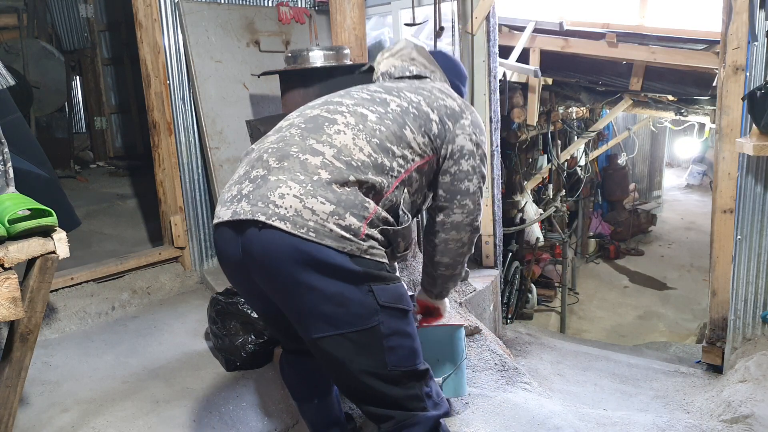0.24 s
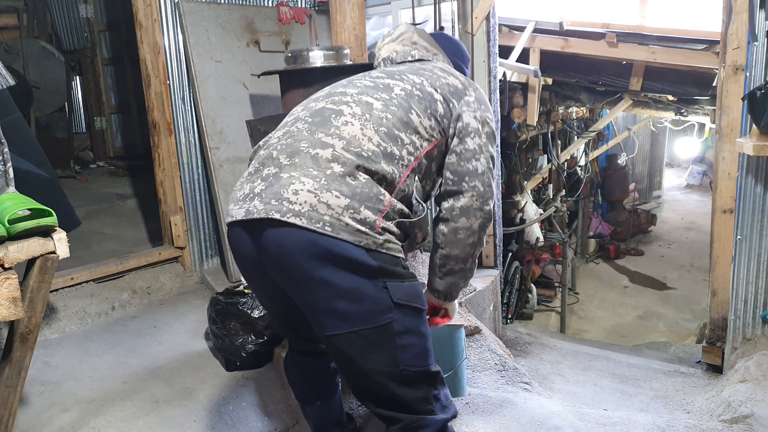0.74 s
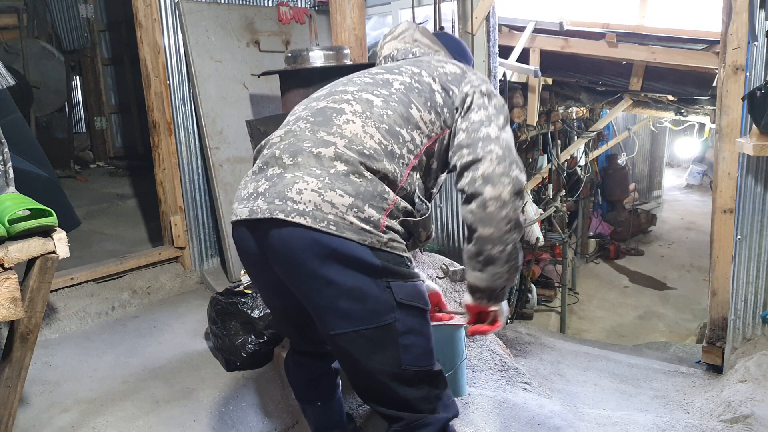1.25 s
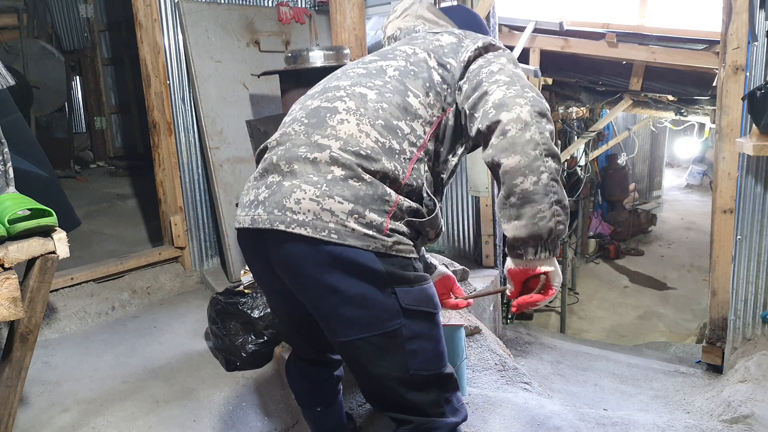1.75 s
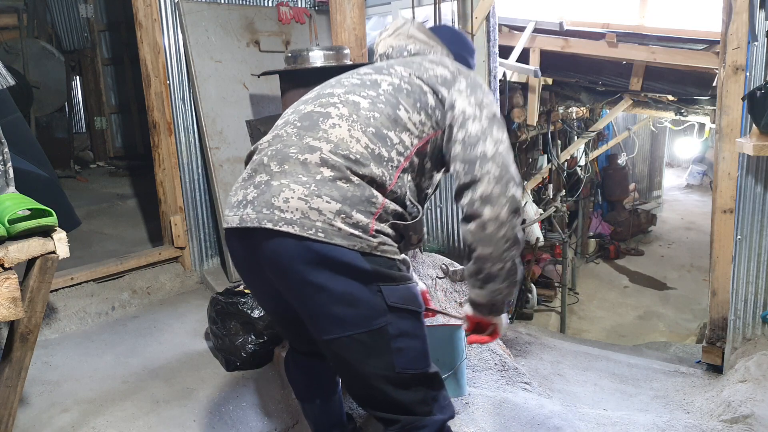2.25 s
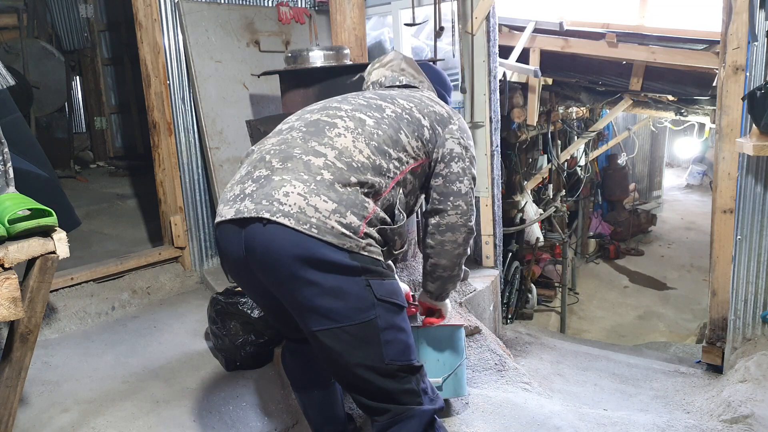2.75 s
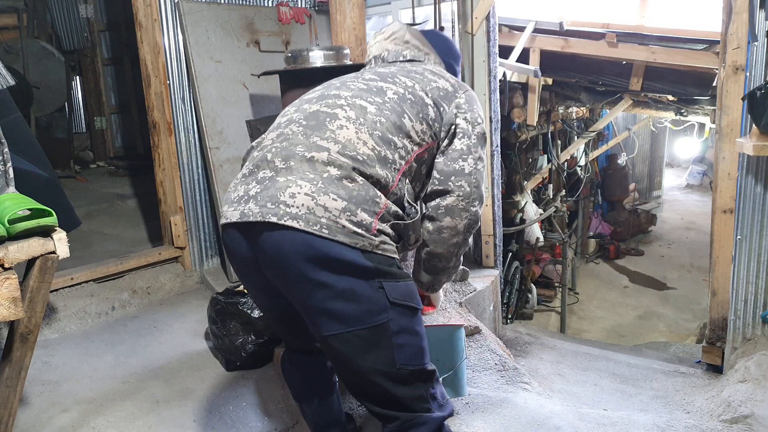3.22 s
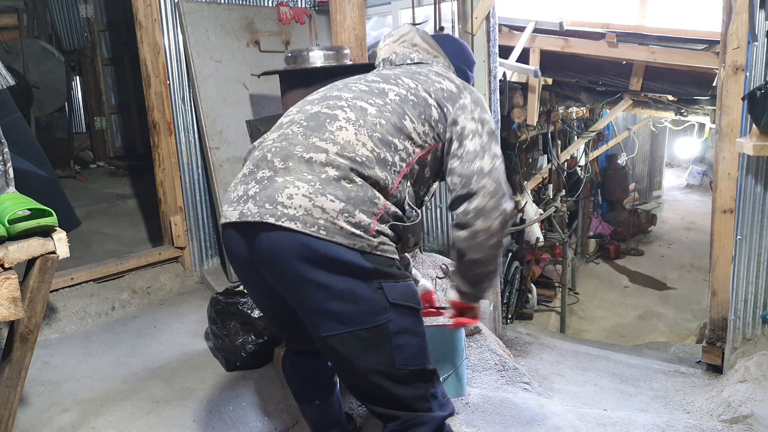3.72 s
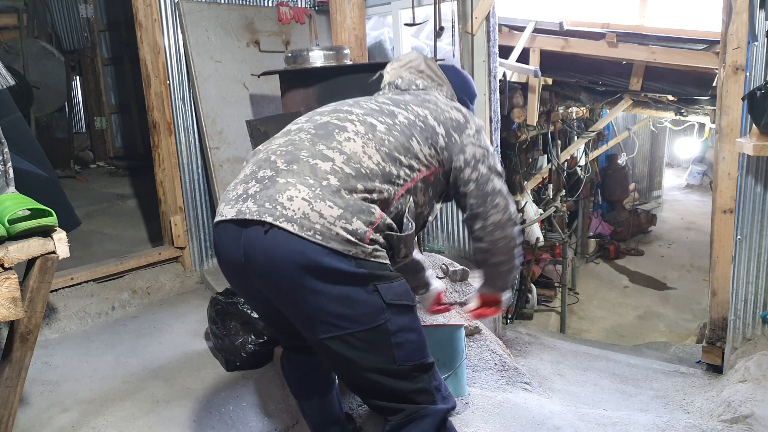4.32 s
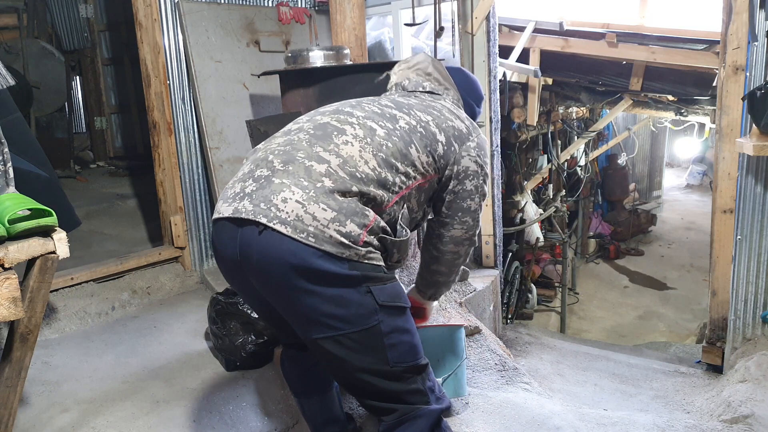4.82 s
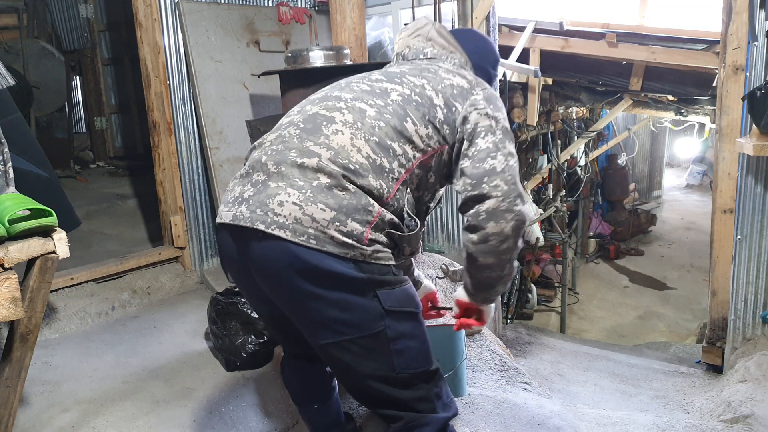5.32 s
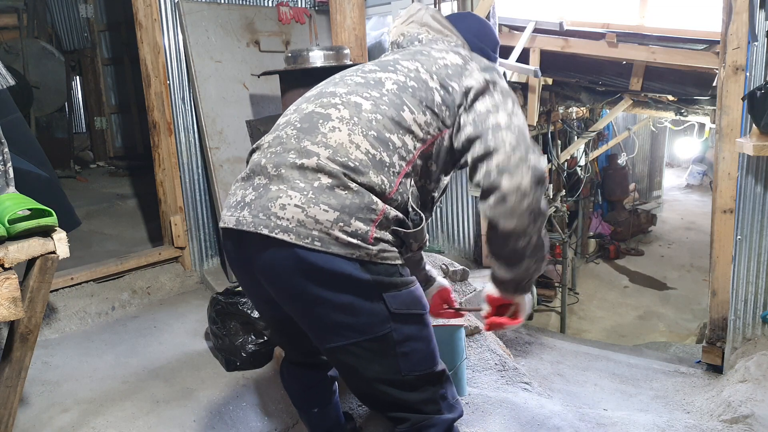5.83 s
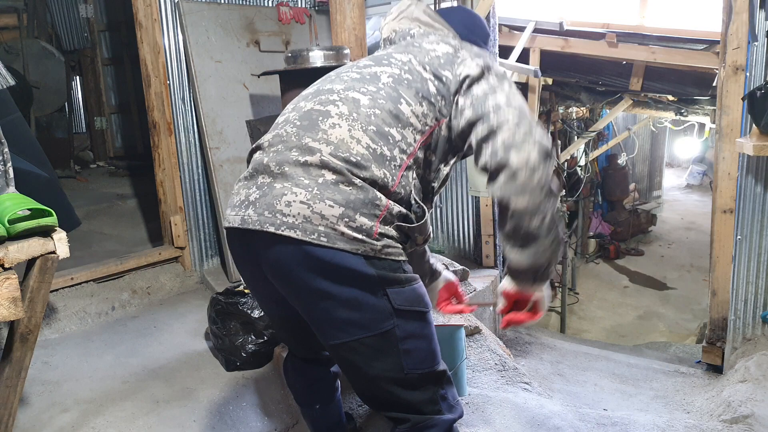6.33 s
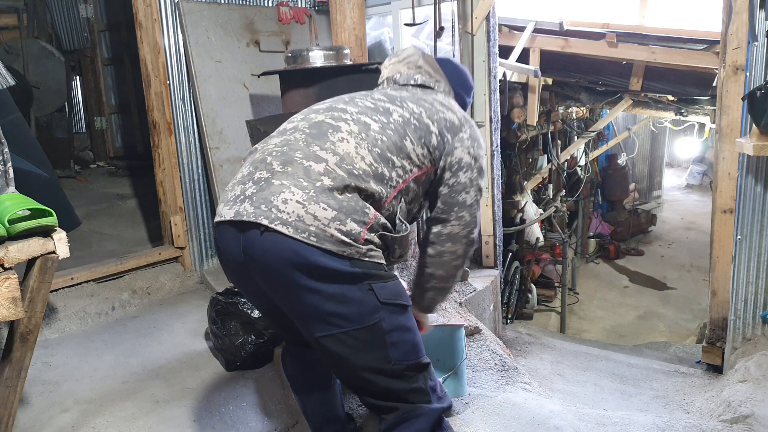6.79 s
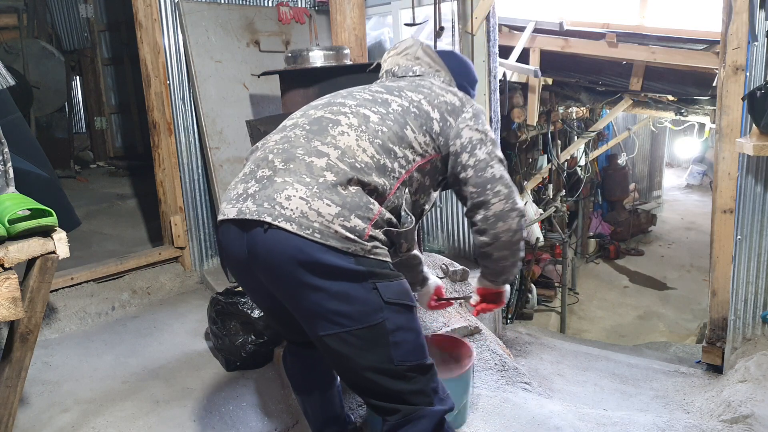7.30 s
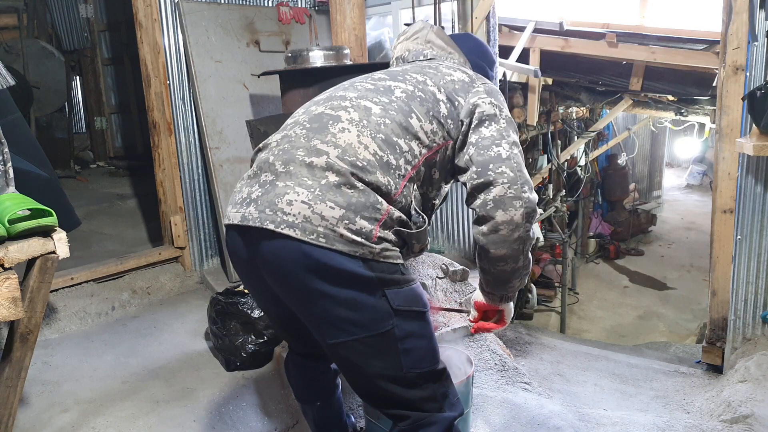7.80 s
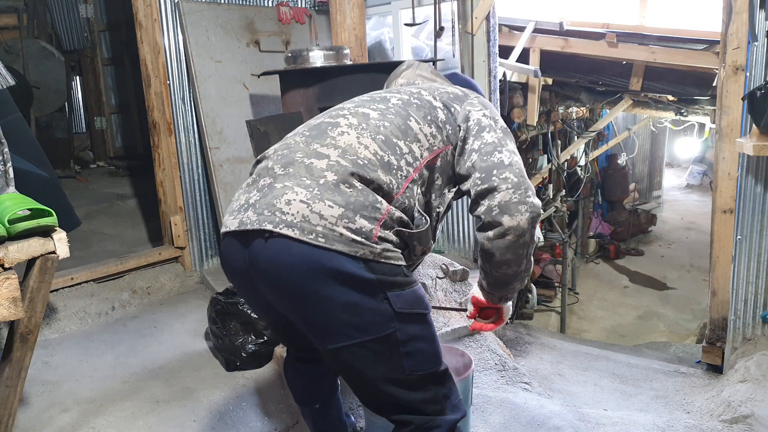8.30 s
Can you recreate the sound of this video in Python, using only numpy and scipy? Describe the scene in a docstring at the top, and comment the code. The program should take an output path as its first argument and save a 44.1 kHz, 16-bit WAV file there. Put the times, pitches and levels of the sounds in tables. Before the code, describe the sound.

A steel poker jabs, scrapes and rakes gritty ash inside a sheet-metal stove, with clanks, then lumps thump into a bucket in a small workshop.

```python
"""A steel poker digs ash out of a sheet-steel stove in a small workshop, two metres from a stereo phone.
From the start it jabs and rakes, and shaped noise grinds and hisses as grit drags over the plate.
All along, blows and sliding ring decaying modes of stove and rod, and slow shoves rumble underneath.
Shortly before 7.3 s and again near 7.45 s lumps thump into a bucket; weaker scrapes close the scene.
Echoes of stove and shop surround it all, over a steady quiet noise."""
import sys
import numpy as np
from scipy import signal
from scipy.fft import rfft, irfft, next_fast_len
from scipy.io import wavfile
from scipy.ndimage import uniform_filter1d, map_coordinates

SR = 44100
rng = np.random.default_rng(int(sys.argv[2]) if len(sys.argv) > 2 else 0)


def generate_wav(signal):
    """Clip the signal to [-1, 1] and save it as 16-bit WAV at the path in sys.argv[1]."""
    frames = np.transpose(np.atleast_2d(signal))
    scaled = np.clip(frames, -1, 1) * 32767
    pcm = np.round(scaled).astype(np.int16)
    wavfile.write(sys.argv[1], SR, pcm)


N = 377055
TIME = np.arange(N) / SR  # seconds


def undb(db):
    """Amplitude factor of a level in dB."""
    return 10 ** (np.asarray(db) / 20)


def unit(x):
    """Scales a sound to rms 1."""
    return x / np.sqrt(np.mean(x ** 2))


def colour(x, points):
    """Shapes the spectrum of a sound to (Hz, dB) points; rms 1."""
    size = next_fast_len(len(x))
    hz, db = np.transpose(points)
    bin_hz = np.arange(size // 2 + 1) * SR / size
    gain = undb(np.interp(np.log(bin_hz + 1), np.log(hz), db))
    return unit(irfft(rfft(x, size) * gain, size)[:len(x)])


def high_pass(x, order, hz):
    """Takes away the bass below a corner frequency."""
    return signal.sosfilt(signal.butter(order, hz, "high", fs=SR, output="sos"), x)


def low_pass(x, order, hz):
    """Takes away the treble above a corner frequency."""
    return signal.sosfilt(signal.butter(order, hz, fs=SR, output="sos"), x)


def ring(x, hz, t60):
    """One decaying mode, -60 dB after t60 seconds; a unit impulse starts it at amplitude 1."""
    radius, angle = 1000 ** (-1 / (t60 * SR)), 2 * np.pi * hz / SR
    return signal.lfilter([0, np.sin(angle)], [1, -2 * radius * np.cos(angle), radius * radius], x)


def place(rows, db):
    """Impulses of the given strength at the row times."""
    x = np.zeros(N)
    x[(rows[:, 0] * SR).astype(int)] = undb(db)
    return x


def walk(rate):
    """Random levels slewed from one to the next in 1 / rate s; spread a little under 1."""
    k = int(SR / rate)
    held = np.repeat(rng.standard_normal(N // k + 1), k)
    return uniform_filter1d(held, k)[:N]


def grit(grain_s, scatter_db):
    """Noise whose strength changes from grain to grain, slewed over one grain; rms 1."""
    k = max(int(grain_s * SR), 1)
    grain_db = scatter_db * rng.exponential(size=N // k + 1)
    size = np.repeat(undb(grain_db), k)[:N]
    return unit(rng.standard_normal(N) * uniform_filter1d(size, k))


def patches(x, shift_db, width_hz, hold_s):
    """The dense short modes of the plate: the travelling contact point favours now these bands, now those."""
    hz, s, spectrum = signal.stft(x, SR, nperseg=512)
    field = rng.standard_normal((120, 200))  # bands by moments
    where = np.meshgrid(hz / width_hz, s / hold_s, indexing="ij")
    favour = undb(shift_db * map_coordinates(field, where, order=1))
    return signal.istft(spectrum * favour, SR, nperseg=512)[1][:N]


def both_ears(length):
    """Two noises, alike in the bass where the phone's ports lie well within a wavelength."""
    same_hz = 520
    same, left, right = rng.standard_normal((3, length))
    return low_pass(same, 2, same_hz) + high_pass([left, right], 2, same_hz)


def quiet():
    """The steady background: faint coloured noise at both ports."""
    # Each row: frequency in Hz, relative level in dB per Hz.
    quiet_points = [(15, -46.5), (25, -23.5), (64, -11), (120, -26), (354, -20), (624, -14.5), (695, -10.5),
                    (911, -19), (2840, -22), (3620, -25.5), (16000, -40)]
    return undb(-64) * np.array([colour(c, quiet_points) for c in both_ears(N)])


def shop(x):
    """Quick echoes inside the stove and off the clutter, then the fainter tail of the walls."""
    near_t60_s, walls_t60_s, walls_db = 0.072, 0.17, -11.5
    t = np.arange(SR // 2) / SR
    fade = 1000 ** (-t / near_t60_s) + undb(walls_db) * 1000 ** (-t / walls_t60_s)
    tail = both_ears(len(t)) * fade
    tail /= np.sqrt(np.sum(tail ** 2) / 2)  # unit energy per port on average
    return signal.fftconvolve(x[None], tail, axes=1)[:, :N]


def rumble():
    """Shoves rock the stove on the floor: low noise swells fast and dies more slowly."""
    # Each row: peak in seconds, relative level in dB.
    shoves = [(0, -60), (.5, -41.5), (1.05, -53), (2.93, -45), (3.76, -52), (4.28, -42), (4.5, -40.5),
              (4.878, -62.5), (5.17, -50), (5.81, -49), (6.8, -47), (7.28, -41), (7.45, -36)]
    # Each row: frequency in Hz, relative level in dB per Hz.
    deep = [(15, -50), (25, -11.5), (59, -2), (75, 1), (97, -12), (124, -2.5), (160, -7), (210, -28.5),
            (350, -120)]
    rise_db_per_s, fall_db_per_s, rest_db = 245.5, 82.5, -75.5
    db = np.full(N, rest_db)
    for s, peak_db in shoves:
        below_peak = np.maximum(rise_db_per_s * (s - TIME), fall_db_per_s * (TIME - s))
        db = np.maximum(db, peak_db - below_peak)
    return undb(db - 6.0) * colour(rng.standard_normal(N), deep)


def thumps():
    """Lumps land in the bucket: a short knock of its wall over its deep drum note."""
    # Each row: start in seconds, relative strength in dB, pitch of the knock in Hz.
    lumps = [(7.286, -4, 376), (7.313, -19.5, 331), (7.442, -8, 400), (7.446, -23, 470)]
    out = np.zeros(N)
    for row in np.array(lumps):
        blow = place(row[None], row[1])
        out += undb(0.5) * ring(blow, row[2], 0.0095)
        out += undb(5) * ring(blow, 1150, 0.0077)
        out += undb(-21.5) * ring(blow, 68, .2)  # drum note
    return out


def rod():
    """Sliding friction feeds the rod's own modes in fits and starts."""
    # Each row: start in seconds, length in seconds, relative level at the start in dB, at the end in dB.
    slides = [(0.858, 0.44, -57, -41.5), (1.382, 0.2, -36.5, -56), (2.09, 0.29, -51.5, -61),
              (3.445, 0.24, -56, -73), (3.702, 0.098, -42, -35.5), (4.937, .5, -48, -54.5),
              (7.523, 0.36, -43, -71)]
    # Each row: mode in Hz, relative level in dB, t60 in seconds.
    rod_modes = [(1240, -10, 0.021), (1668, -1.5, 0.029), (2990, -5, 0.056), (4930, -23, .12),
                 (5500, -17, .06), (6000, -11.5, 0.02), (6480, -10, .04), (7490, -8.5, 0.058),
                 (9480, -24, 0.042), (11600, -24, 0.026)]
    fade_s = 0.018
    slide = np.zeros(N)
    for s, long, a_db, b_db in slides:
        level = undb(a_db + (b_db - a_db) * (TIME - s) / long)
        slide += level * np.clip(np.minimum(TIME - s, s + long - TIME) / fade_s, 0, 1)
    rub = slide * grit(grain_s=.015, scatter_db=2.)
    out = np.zeros(N)
    for hz, db, t60 in rod_modes:
        even = np.sqrt(4 * np.log(1000) / (t60 * SR))  # long modes gather more noise
        out += undb(db + 4 * walk(9)) * ring(rub, hz, t60) * even
    return out


def stove(rake_db):
    """Blows chatter for a few milliseconds and ring the plate; the grinding keeps it humming faintly."""
    # Each row: blow in seconds, relative strength in dB, pitch that the struck spot favours in Hz,
    # ring at that pitch in dB relative to the strength.
    clinks = [(0.019, -15, 1810, -16), (.02, -26, 400, -3), (.117, -19, 490, -11.5),
              (0.466, -25, 1800, -21), (.538, -17, 1110, -19.5), (.868, -33, 2210, -14),
              (1.136, -23.5, 2560, -11), (1.492, -22.5, 1750, -12.5), (1.618, -10.5, 3930, -19),
              (1.969, -24, 790, -7), (1.972, -31.5, 1810, 0.5), (2.167, -23, 3811, -16),
              (2.35, -14, 2560, -13.5), (2.461, -16, 2800, -14), (2.576, -14.5, 1810, -16.5),
              (2.853, -15, 3330, -17), (2.951, -22, 2120, -7.5), (3.099, -28, 477, -11),
              (3.305, -55.5, 238, 2.5), (3.445, -47.5, 1300, -14.5), (3.679, -37.5, 488, -13),
              (3.725, -26, 1800, -20), (3.956, -22.5, 790, -18.5), (3.975, -18, 1810, -12),
              (4.149, -10, 2600, -19.5), (4.25, -18.5, 488, -16), (4.41, -9, 586, -16.5),
              (4.43, -33, 238, 8.5), (4.44, -31.5, 3811, -5), (4.668, -13.5, 1810, -9),
              (4.761, -9.5, 2300, -18), (4.924, -24, 3811, -10), (5.185, -39.5, 1580, -7.5),
              (5.526, -47.5, 238, 4.5), (5.672, -45, 2580, -30), (5.831, -17.5, 1670, -15),
              (5.998, -23, 3840, -14.5), (6.311, -27, 1270, -7.5), (6.501, -9, 820, -19),
              (6.578, -21.5, 2630, -5), (6.73, -29, 488, -16), (7.014, -22, 488, -19), (7.06, -32, 238, 9),
              (7.285, -8.5, 510, -19), (7.411, -14, 488, -25), (8.362, -35, 488, -33)]
    # Each row: plate mode in Hz, relative level in dB, t60 in seconds.
    plate_modes = [(238.6, -11.5, 0.58), (397.4, -5.5, 0.36), (488.4, 1, 0.38), (787.5, -1, 0.31),
                   (1154.5, -3, 0.27), (1523, -14, 0.46), (1811, 1.5, 0.23), (2085, -5, 0.2),
                   (2430, -12, 0.2), (3040, -8, .12), (3190, -12.5, 0.1), (3440, -11, 0.16),
                   (3833, 1, 0.24), (5000, -19.5, 0.4), (6700, -11.5, 0.47), (6800, -28, 0.14)]
    spot_db_per_octave, spot_reach_db = 13, 16
    rows = np.array(clinks)
    spot = rng.standard_normal((len(rows), len(plate_modes)))
    t = np.arange(int(.03 * SR)) / SR
    chatter = rng.standard_normal(len(t)) * np.exp(-t / .004)
    chatter /= np.sqrt(np.sum(chatter ** 2))
    bright = np.diff(chatter)  # tilts it to the treble
    out = undb(-21.0) * signal.oaconvolve(place(rows, rows[:, 1]), bright)[:N]
    hum = undb(rake_db - 55) * rng.standard_normal(N)
    for k, (hz, db, t60) in enumerate(plate_modes):
        octaves = np.abs(np.log2(hz / rows[:, 2]))
        ring_db = rows[:, 3] - np.minimum(spot_db_per_octave * octaves, spot_reach_db)
        blows = place(rows, rows[:, 1] + ring_db + 4.5 + 2 * spot[:, k])
        out += undb(db) * ring(hum + blows, hz, t60)
    return out


def strokes():
    """Levels of grinding, boom and hiss: each stroke rises, sags while it drags, drops and trickles out."""
    # Strokes through the grit. Each row: start in seconds, rise in seconds, drag in seconds,
    # relative grinding level in dB, boom of the box and hiss of fine ash in dB relative to the grinding.
    stroke_rows = [(0, 0.0017, 0.06, -27.5, -21, -23), (0.113, 0.0054, 0.036, -27.5, -18.5, -22),
                   (.33, 0.04, 0.1, -57.5, 3, -7.5), (.43, 0.028, 0.032, -43, -4, -10.5),
                   (.535, 0.0022, 0.0067, -23.5, -14, -21), (0.865, 0.0019, 0.048, -42, -33, -18.5),
                   (.93, 0.045, 0.13, -42, -5, -20.5), (1.13, 0.0031, 0.0053, -26, -35, -20.5),
                   (1.15, 0.022, 0.33, -35.5, -18.5, -18.5), (1.36, 0.085, 0.0092, -35, -14, -19.5),
                   (1.475, 0.023, 0.13, -35, -8, -18), (1.616, 0.0033, 0.0048, -24, -27, -29),
                   (1.83, 0.0035, 0.18, -62.5, -2, -2.5), (1.965, 0.0033, 0.011, -30.5, -11, -34),
                   (2.11, 0.021, .01, -43.5, -20, -21), (2.159, 0.0056, 0.014, -25.5, -27, -29),
                   (2.255, 0.0083, .005, -38, -13, -23.5), (2.351, 0.0097, 0.032, -25, -38, -21),
                   (2.459, 0.0034, 0.032, -35.5, -28, -15.5), (2.574, 0.0045, 0.043, -28.5, -16, -25),
                   (2.791, 0.0074, 0.054, -57, -18, -21.5), (2.849, 0.0053, 0.046, -20.5, -14, -25.5),
                   (2.923, 0.017, 0.041, -26, -37, -24), (3.097, 0.0018, 0.0043, -30.5, -9, -27.5),
                   (3.29, 0.0092, 0.012, -69, 9, -37), (3.443, 0.0025, 0.021, -56.5, -3.5, -9),
                   (3.64, .05, .005, -53.5, 9.5, -14), (3.71, 0.046, 0.0087, -33.5, -10.5, -18),
                   (3.946, 0.022, 0.0079, -22.5, -26, -23), (4.146, 0.0074, 0.0089, -19, -19.5, -19),
                   (4.233, 0.075, 0.22, -21.5, -13.5, -27.5), (4.37, 0.044, 0.022, -19.5, -17, -24.5),
                   (4.644, .025, 0.016, -21.5, -42, -26.5), (4.755, 0.022, 0.016, -25, -22, -23),
                   (4.82, .01, 0.087, -35.5, -2.5, -37), (4.916, 0.012, .005, -28, -32, -38),
                   (5, 0.015, 0.071, -62, 9, 0), (5.135, 0.017, 0.11, -48.5, 5, -15.5),
                   (5.335, 0.011, 0.11, -59, 11, -11), (5.43, 0.038, 0.044, -58, 4, -14),
                   (5.524, 0.0045, .04, -55, -6, -22), (5.63, 0.058, 0.036, -48, -26, -19.5),
                   (5.718, 0.12, 0.027, -32, -8.5, -21), (5.87, 0.025, 0.078, -35.5, -12, -20.5),
                   (5.97, 0.018, 0.016, -38.5, -27, -15), (6.304, 0.0035, .02, -34.5, -22, -35),
                   (6.408, 0.031, 0.078, -41.5, -31, -21), (6.498, 0.0052, 0.013, -20, -26, -23),
                   (6.575, 0.0092, 0.02, -27, -21, -24), (6.713, 0.07, 0.0069, -24.5, -13, -26),
                   (6.945, .02, 0.059, -44, -21, -30.5), (7.01, 0.0028, 0.01, -19, -11.5, -26),
                   (7.059, 0.14, 0.024, -22.5, -15, -29), (7.284, 0.0017, .005, -15.5, -12, -15.5),
                   (7.33, 0.055, .05, -30, -2.5, -9.5), (7.409, 0.0037, .025, -23.5, -10, -9.5),
                   (7.441, .002, 0.028, -23, -9.5, -13.5), (7.5, 0.0093, 0.091, -41.5, -6, -14.5),
                   (7.649, 0.01, 0.096, -48.5, -36, -15), (8.155, .003, .005, -57, -16, -21),
                   (8.305, 0.0071, 0.0077, -62, -15, -3.5), (8.357, .004, 0.008, -57.5, 0, 3),
                   (8.45, 0.058, .02, -56.5, -9.5, -15)]
    rise_power, sag_db_per_s, fall_db_per_s = 0.66, 45, 304.5
    trickle_db, trickle_db_per_s = -37, 66.5  # ash that runs on after a stroke
    power = np.full((3, N), 1e-12)
    t = TIME[:SR]
    for s, rise, drag, db, boom_db, ash_db in stroke_rows:
        after = np.maximum(t - rise - drag, 0)
        shape = np.minimum(t / rise, 1) ** rise_power
        shape *= undb(-sag_db_per_s * np.clip(t - rise, 0, drag))
        shape *= undb(-fall_db_per_s * after) + undb(trickle_db - trickle_db_per_s * after)
        start = int(s * SR)
        levels = undb(db + np.array([[0], [boom_db], [ash_db]])) * shape
        power[:, start:start + SR] += levels[:, :N - start] ** 2
    return 10 * np.log10(power)


def raking(db, boom_db, ash_db):
    """Grit under the rod grinds and hisses; the box booms along and lingers after each stroke."""
    # Three spectra. Each row: frequency in Hz, relative level in dB per Hz.
    grind_points = [(180, -49), (300, -22), (489, -7.5), (628, -4.5), (962, -7.5), (1730, -3.5), (2310, -7),
                    (3050, -6), (3590, -10), (3730, -10.5), (6000, -29.5), (7800, -39.5), (13200, -120)]
    boom_points = [(88, -42.5), (150, -21), (237, -7.5), (302, -16.5), (389, -0.5), (500, -7), (650, -14.5),
                   (1100, -120)]
    ash_points = [(2650, -20), (4500, -11), (4650, -11), (5080, -6.5), (6250, -5), (7570, -6.5),
                  (9560, -16.5), (15200, -22.5), (16000, -41)]
    box_t60_s = 0.58
    rough = patches(grit(grain_s=.004, scatter_db=1.5), shift_db=4.0, width_hz=251.3, hold_s=.08)
    keep = 1000. ** (-2 / (box_t60_s * SR))  # share of its energy the box keeps per sample
    stored = signal.lfilter([1 - keep], [1, -keep], undb(boom_db) ** 2)
    boom = np.sqrt(stored) * colour(rng.standard_normal(N), boom_points)
    grind = undb(db) * colour(rough, grind_points)
    hiss = undb(ash_db + 6.0) * colour(rough, ash_points)
    return grind + hiss + boom


def scene():
    """Sums the direct sound at the two ports, the echoes, the rumble and the quiet noise."""
    knocks = undb(-5.5) * thumps()
    rake_db, boom_db, ash_db = strokes()
    grind = raking(rake_db, boom_db, ash_db) + undb(-4) * knocks
    # takes the bass out from under the ringing metal
    metal = high_pass(stove(rake_db) + rod(), 2, 220)
    # random crossfades between two echo patterns, quick for the grit, slow for the ringing, widen the sound
    quick, slow = 2 * walk(30), walk(2)  # angles in radians
    echoes = np.zeros((2, N))
    for turn in (np.cos, np.sin):
        echoes += shop(grind * turn(quick) + undb(-11) * metal * turn(slow))
    # the ringing metal sounds mostly direct, the grit mostly through echoes
    near = undb(-12) * grind + undb(-1) * metal + knocks
    direct = np.array([np.roll(near, 4), near])  # reaches the left port 4 samples later
    return direct + undb(-0.08) * echoes + rumble() + quiet()


def record(dry):
    """The right channel tilts to the bass; the deepest bass and the top above 15.9 kHz are filtered out."""
    bass = low_pass(dry[1], 1, 300)
    heard = np.array([dry[0], undb(-1.23) * dry[1] + undb(-5) * bass])
    heard = high_pass(heard, 4, 48)
    top = signal.ellip(10, .2, 80, 15900, fs=SR, output="sos")  # steep cut
    return signal.sosfilt(top, heard)


dry = scene()
out = record(dry)
generate_wav(out)
```